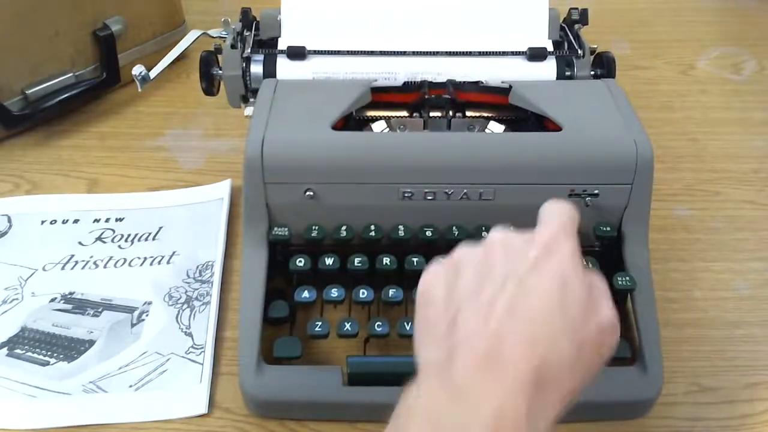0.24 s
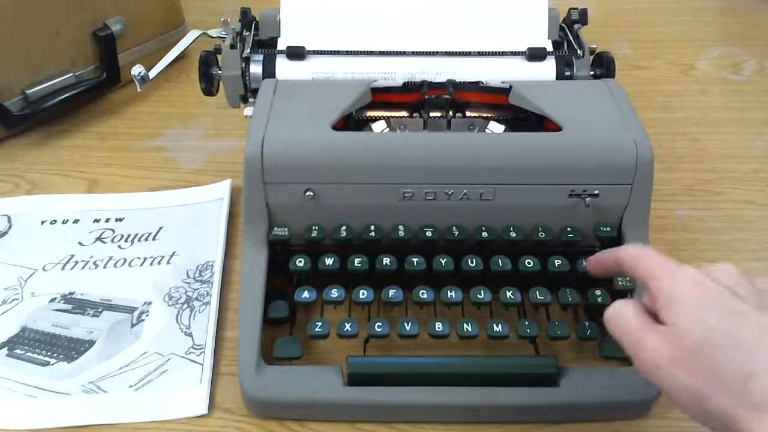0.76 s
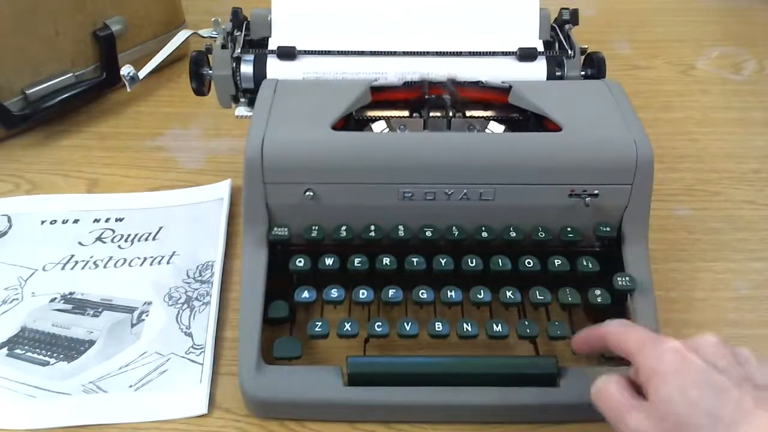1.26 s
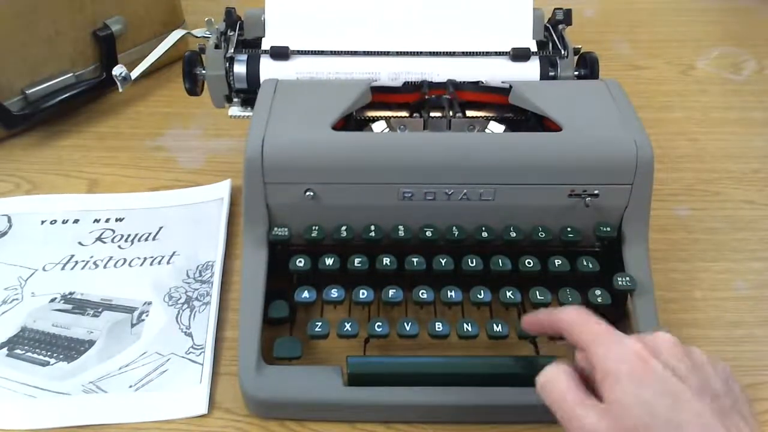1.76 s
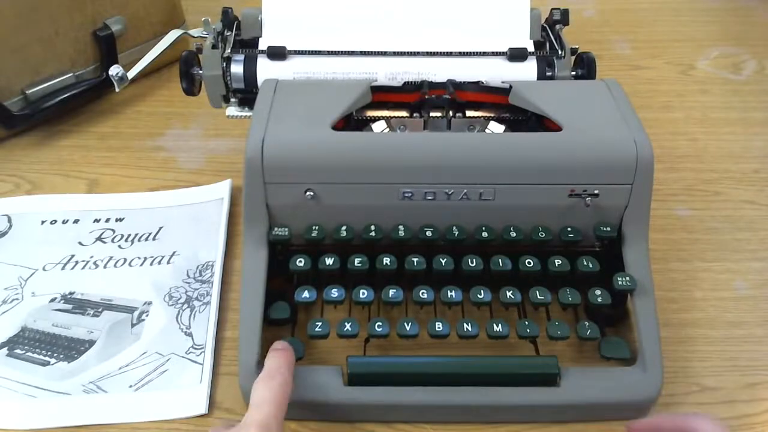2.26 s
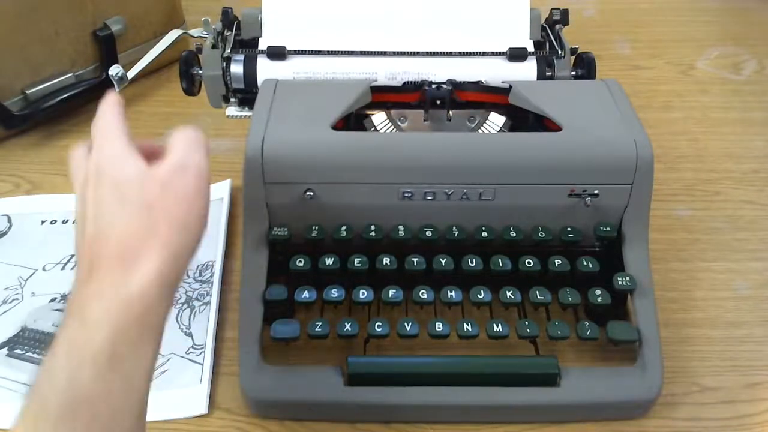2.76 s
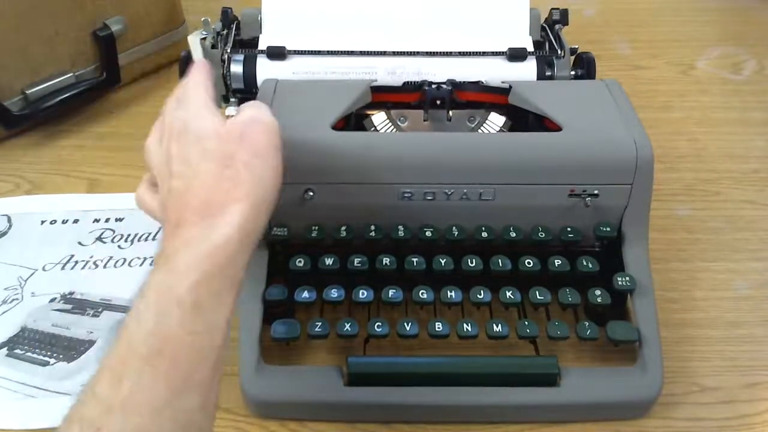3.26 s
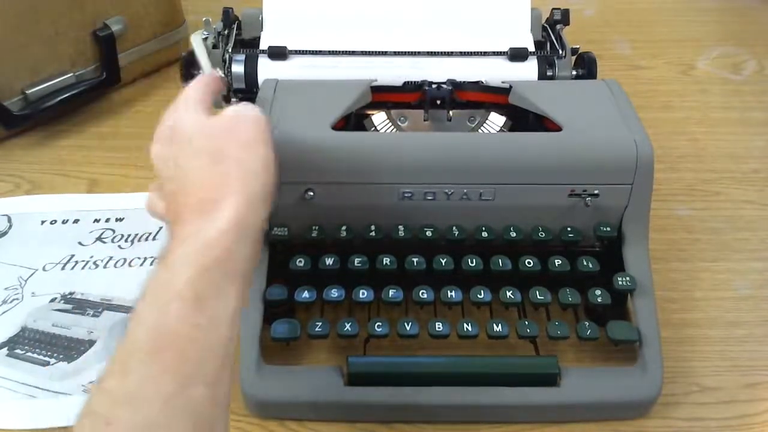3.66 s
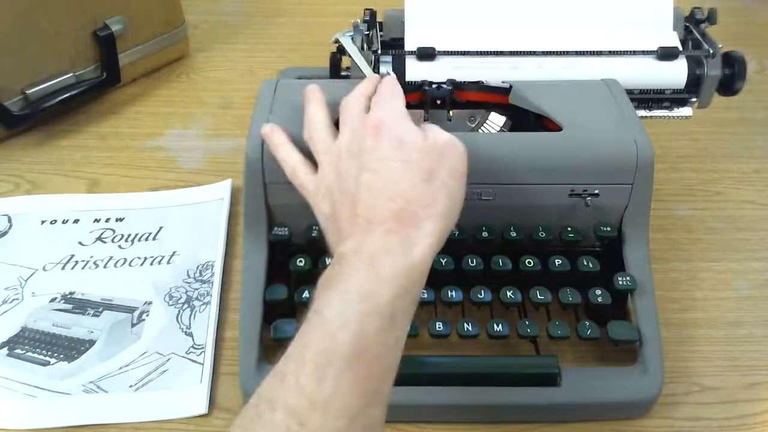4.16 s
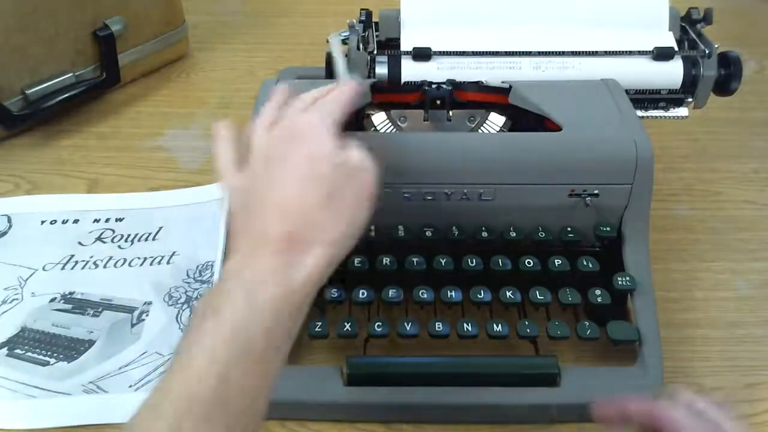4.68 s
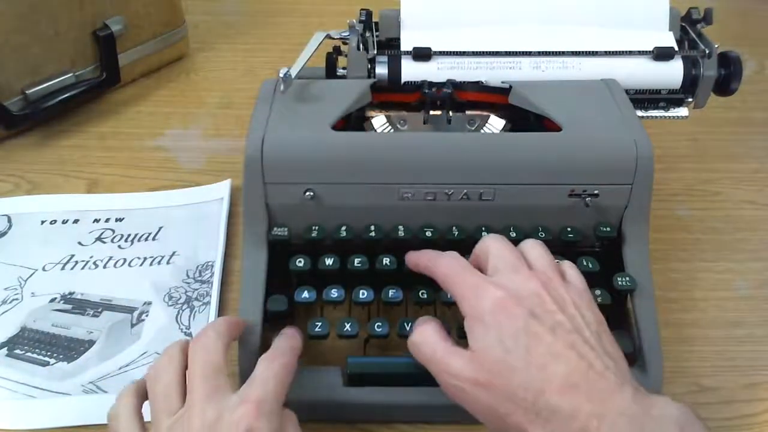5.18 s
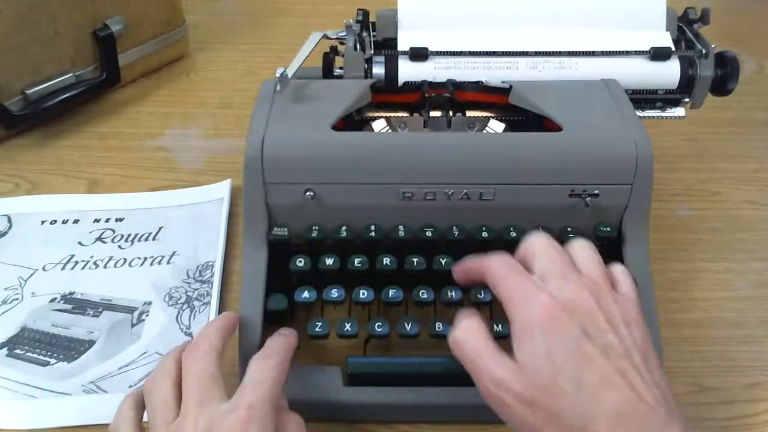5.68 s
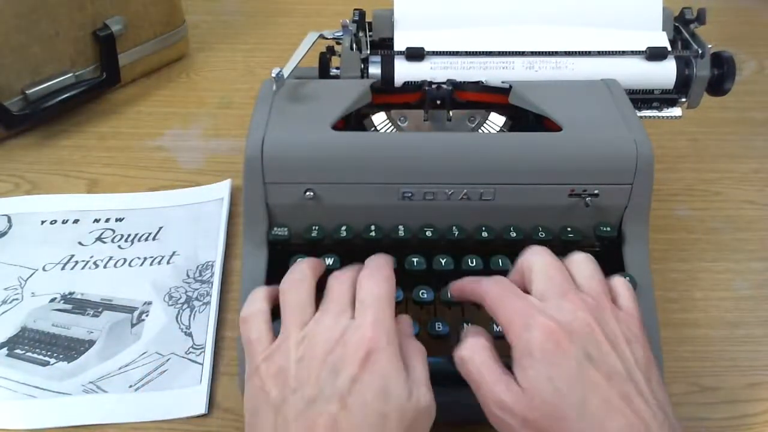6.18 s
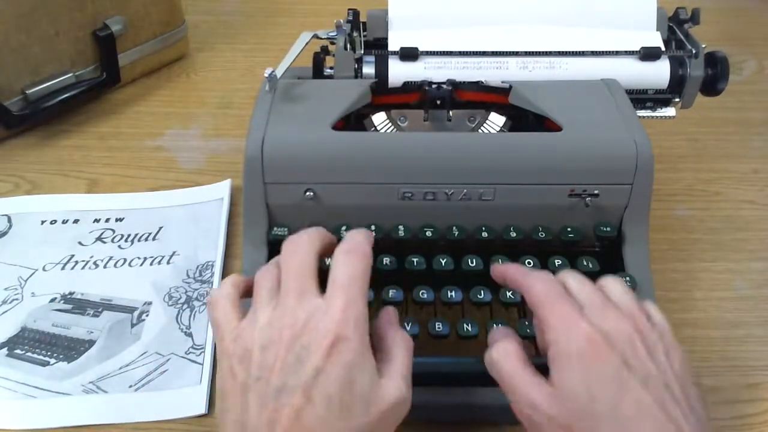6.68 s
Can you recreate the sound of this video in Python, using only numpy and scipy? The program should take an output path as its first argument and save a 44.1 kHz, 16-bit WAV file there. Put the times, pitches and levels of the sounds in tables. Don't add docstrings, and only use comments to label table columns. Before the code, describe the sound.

Close, dry typewriter clatter: spaced key strikes, lever clunks, a short carriage slide to its stop, quiet clicks, then a burst of typing.

```python
import sys
import numpy as np
from scipy import signal
from scipy.fft import rfft, irfft, next_fast_len
from scipy.io import wavfile
from scipy.ndimage import uniform_filter1d, minimum_filter1d

SR = 44100
rng = np.random.default_rng(int(sys.argv[2]) if len(sys.argv) > 2 else 0)


def voltage_ratio(decibels):
    exponent = np.asarray(decibels, float) / 20
    return 10 ** exponent


def output_pcm(signal):
    pcm = np.clip(np.atleast_2d(signal).T, -1, 1) * 32767
    wavfile.write(sys.argv[1], SR, np.round(pcm).astype(np.int16))


N = 305613
TIME_S = np.arange(N) / SR


def unit(x):
    return x / np.sqrt(np.mean(x ** 2) + 1e-20)


def along(points, hz):
    f, v = np.transpose(points)
    return np.interp(np.log(hz + 1), np.log(f + 1), v)


def filtered(x, response):
    m = next_fast_len(N + SR // 2)
    return irfft(rfft(x, m) * response(np.fft.rfftfreq(m, 1 / SR)), m)[:N]


def grit(spiky_db, grain_s):
    jumps = rng.standard_normal(N)[(np.arange(N) / (grain_s * SR)).astype(int)]
    return rng.standard_normal(N) * voltage_ratio(spiky_db * jumps)


def swell(t, db, t60, rise_s):
    return voltage_ratio(db - 60 * t / t60) * (1 - np.exp(-t / rise_s))


def shakes(rows, noise, rise_s, sharp, count=1):
    out, noise = np.zeros(N + SR), np.tile(noise, 2)
    for k, (s, db, t60, hz, ring_db) in enumerate(rows):
        t = np.arange(int(np.clip(t60, .06, .5) * SR)) / SR
        raw = noise[k * 4001:][:len(t)]
        ring = raw
        for _ in range(count):
            ring = signal.lfilter(*signal.iirpeak(hz, sharp, SR), ring)
        voice = unit(raw + voltage_ratio(ring_db) * unit(ring))
        out[round(s * SR):][:len(t)] += voice * swell(t, db, t60, rise_s)
    return out[:N]


def resonant(modes, broad_db):
    def peak(hz, centre, width):
        return 1j * hz * width / (centre ** 2 - hz ** 2 + 1j * hz * width)

    def response(hz):
        narrow = sum((-1) ** k * voltage_ratio(db) * peak(hz, c, w) for k, (c, w, db) in enumerate(modes))
        body = narrow + voltage_ratio(broad_db) * peak(hz, 1100, 1500)
        return body / (1 + 1j * hz / 2300) ** 2 * (0.5 + 0.6 / (1 + (hz / 2150) ** 12))

    return response


# (time [s], lead of the faint rattle before it [s], level of that rattle [dB], rattle level [dB],
# knock level [dB])
STROKES = [(0.003, 0.0015, -36.5, -27, -21), (0.2067, 0.026, -35, -26.5, -20),
           (0.7666, 0.015, -34, -26, -15), (1.002, 0.014, -37, -29.5, -16),
           (1.2057, 0.011, -37.5, -26, -16), (1.3838, 0.0078, -34, -30, -17.5),
           (1.6196, 0.026, -33, -26, -18), (1.8099, 0.025, -37, -26, -18), (5.5795, 0.01, -36, -23.5, -17),
           (6.1741, 0.013, -38.5, -26.5, -19.5), (6.2957, 0.0082, -29.5, -29, -18.5),
           (6.9176, 0.024, -35, -18.5, -9)]
SNAP_DB = [-60, -11.4, -10.5, -13.7, -14.3, -14.9, -15.1, -17, -2.7, -5.1, -3.6, -0.4]
# (time [s], peak level [dB], frequency [Hz])
TICKS = [
    (0.311, -28, 4260),
    (3.4188, -40, 6300),
    (4.263, -22.5, 5230),
    (6.49, -32, 3670),
    (0.217, -20, 5000),
    (1.2145, -23, 5300),
    (4.8023, -43, 5400),
]


def snaps():
    out, t = np.zeros(N + SR), np.arange(-40, 40) / SR
    strokes = [(s, db, 4860) for (s, *_), db in zip(STROKES, SNAP_DB)]
    for s, db, hz in strokes + TICKS:
        snap = np.sin(2 * np.pi * hz * t + 1) * np.exp(-(t / .00028) ** 2)
        for delay_s, loss_db in [(0, 0), (.0008, 7), (.0022, 16.5)]:
            out[round((s + delay_s) * SR) - 40:][:len(t)] += voltage_ratio(db - loss_db) * snap
    return out[:N]


# (time [s], rattle level [dB], knock level [dB], push level [dB], desk mode [Hz])
FALLS = [
    (0.099, -38, -12.5, -11, 155),
    (0.313, -34.5, -19, -13, 165),
    (0.896, -51.5, -23.5, -17, 210.3),
    (1.109, -62, -16.5, -11.5, 157.4),
    (1.29, -64, -13.5, -14.5, 165.7),
    (1.513, -35, -14.5, -20, 231),
    (1.706, -52, -19, -18, 189),
    (1.909, -43, -23, -18.5, 160),
    (5.672, -29, -18, -19.5, 191),
    (6.386, -30.5, -17.5, -19.5, 220),
]
# (time [s], level [dB], t60 [s], struck part [Hz], ring level [dB])
SPRINGS = [(0.727, -49, 1.5, 4500, -15), (0.84, -52, 0.31, 4780, -9.5), (2.3661, -48, 0.11, 3030, -19),
           (0.35, -50, 0.8, 3600, -6), (2.624, -36, 0.17, 4800, -12), (2.61, -48, 0.3, 3900, -8),
           (3.101, -68.5, 0.81, 4460, -16), (3.188, -57, 0.34, 3500, -9.5), (3.261, -48.5, 0.18, 5100, -23),
           (3.418, -49.5, 0.14, 6500, -4), (3.652, -61.5, 0.35, 3900, -7.5),
           (3.754, -42.5, 0.2, 2270, -1.5), (4.703, -43, 0.16, 2700, 5), (4.712, -41, 0.1, 4900, 6),
           (5.8187, -42, 0.17, 5960, -11.5), (6.252, -28, 0.17, 4400, -12),
           (6.492, -41.5, 0.38, 2250, -16.5), (6.601, -39, 0.21, 2500, -16.5), (6.63, -33, 0.14, 2200, 3),
           (2.642, -38.5, 0.22, 3400, -4), (5.84, -54, 0.33, 4540, -17.5), (3.36, -59.5, 0.24, 3700, -9),
           (0.894, -44, 0.25, 5100, -2), (1.05, -37, 0.27, 4650, -8), (1.25, -35, 0.29, 4500, -5),
           (1.44, -40.5, .4, 4860, -4), (6.675, -54, 0.35, 3300, -4), (4.29, -52, 0.4, 4900, 3),
           (2.74, -67, 1.1, 2600, -4), (2.93, -70, 0.79, 2300, -12), (5.35, -68.5, .6, 2600, -4),
           (4.13, -46, 0.27, 5600, -3), (3.9, -47, 0.48, 5400, 6.5), (5.74, -46.5, 0.35, 3700, -16),
           (0.31, -48, 0.33, 5000, -10.5), (1.94, -53, 0.5, 2800, 3), (0.69, -60, 1.5, 3000, -10),
           (6.42, -40, 0.25, 2900, 2), (5.85, -53, 0.4, 3000, -3)]
# (frequency [Hz], level per Hz [dB])
STEEL = [(1290, -29), (2200, 0), (2410, -5), (2660, -0.5), (3070, 0.5), (3290, 1.5), (3950, 0.5),
         (5060, -2), (6280, 0.5), (7520, -8.5), (9780, -56.5), (16500, -120)]


def rattle():
    leads = [(s - lead_s, db, 0.41, 4950, -8.5) for s, lead_s, db, *_ in STROKES]
    blows = [(s - .001, db, 0.24, 4950, -8.5) for s, *_, db, _ in STROKES]
    falls = [(s, db, 0.16, 4360, -6) for s, db, *_ in FALLS]
    rebounds = [(s, db + 3, .05, 5790, -3) for s, *_, db, _ in STROKES]
    bars = filtered(grit(spiky_db=2.0, grain_s=0.0012), lambda hz: voltage_ratio(along(STEEL, hz)))
    out = shakes(leads + blows + falls + SPRINGS + rebounds, bars, rise_s=.0025, sharp=8)
    band = filtered(out, lambda hz: np.exp(-((hz - 3510) / 500) ** 2))
    band_db = np.where(TIME_S < 5.605, -4.5, 2.5)
    return out + (voltage_ratio(band_db) - 1) * band


def typebars():
    return snaps() + rattle()


# (time [s], peak level [dB], t60 [s], struck part [Hz], ring level [dB])
ESCAPEMENT = [(0.165, -28, 0.5, 465, 0.5), (0.273, -18.5, 0.19, 900, 1), (0.475, -62, 1, 352, -6),
              (0.71, -42, 1, 890, 9.5), (0.859, -22, 0.55, 1463, 1), (1.05, -22.5, 0.25, 1500, 1),
              (1.43, -31, 1, 1300, 7.5), (1.66, -19, 0.39, 1400, -1.5), (1.775, -28, 0.6, 874, 2.5),
              (1.869, -18.5, 0.19, 956, 0), (5.636, -22, 0.44, 2030, -6.5), (5.813, -29, 0.24, 704, -13.5),
              (5.836, -17.5, 0.13, 810, -3), (6.125, -50, 0.6, 640, -5), (6.225, -17.5, 0.44, 1290, 0),
              (6.43, -21.5, 0.3, 1390, 4.5), (6.487, -17.5, 0.2, 1390, -3.5),
              (6.59, -18.5, 0.16, 545, -20.5), (6.634, -22, 0.22, 1225, 5.5), (6.87, -48.5, 0.43, 668, -5),
              (6.895, -33, 0.6, 1200, -5), (0.74, -42, 1, 1400, -5), (6.69, -38, 0.2, 1300, 0)]
# (time [s], peak level [dB], t60 [s], struck part [Hz], ring level [dB])
LEVERS = [(2.164, -54, 0.43, 662, -15), (2.63, -24.5, 0.23, 718, 6), (2.637, -15.5, 0.2, 635, -4.5),
          (2.956, -54.5, 0.18, 815, -11.5), (3.11, -60, 0.37, 2120, -1), (3.205, -62, 0.38, 371, -25),
          (3.258, -34, 0.34, 1580, 15.5), (3.366, -30.5, 0.11, 605, 2.5), (3.592, -59, 0.59, 1730, 12.5),
          (3.652, -56.5, 0.39, 1670, 3), (3.756, -36, 0.22, 500, 19), (3.875, -44, 0.28, 1350, 7),
          (3.939, -21, 0.042, 800, 0), (4.26, -21, 0.18, 1955, 13), (4.701, -22.5, 0.18, 1180, -12.5),
          (4.72, -22, 0.17, 1106, -6), (4.808, -38.5, 0.14, 1410, 10), (4.858, -38, 0.13, 1400, 4),
          (5.3, -59.5, 0.39, 456.5, 3.5), (5.36, -40, 0.098, 454, 11), (5.385, -53, 0.15, 604, -2),
          (5.526, -45, 0.18, 577, 8)]
# (frequency [Hz], width [Hz], level [dB])
FRAME = [(635, 78, -6), (872.2, 18, 2.5), (1300, 2.6, -4.5), (1390, 9.2, 3), (1823, 36, -5.5)]


def linkage():
    frame = filtered(grit(spiky_db=0.0, grain_s=.003), resonant(FRAME, broad_db=-9.0))
    strokes = [(max(s - .003, 0), db, 0.38, 1760, -12.5) for s, *_, db in STROKES]
    falls = [(s - .006, db, 0.17, 1225, -1.5) for s, _, db, *_ in FALLS]
    hard = shakes(strokes + ESCAPEMENT + LEVERS, frame, rise_s=0.0065, sharp=0.98)
    soft = shakes(falls, frame[::-1], rise_s=0.046, sharp=2.0)
    return voltage_ratio(-7.5) * (hard + voltage_ratio(4.5) * soft)


# (time [s], level [dB], t60 [s], frequency [Hz])
CATCHES = [
    (2.378, -44, 0.22, 2300),
    (2.38, -39, 0.22, 3070),
    (2.379, -48.5, 0.07, 6600),
    (3.418, -44.5, 0.1, 4320),
    (4.259, -36.5, 0.28, 2020),
    (4.261, -39, 0.11, 4890),
    (4.801, -49, 0.14, 4400),
    (4.8021, -42.5, 0.12, 5780),
    (4.855, -50, 0.14, 4600),
]


def catches():
    rows = [(*row, 34) for row in CATCHES]
    rings = shakes(rows, grit(spiky_db=3.5, grain_s=.001), rise_s=0.00077, sharp=5.5, count=2)
    return filtered(rings, lambda hz: 1 / (1 + (1500 / (hz + 1)) ** 8))


# (time [s], peak level [dB], frequency [Hz], t60 [s])
PINGS = [(0.0002, -19, 5550, .012), (2.378, -36.5, 6420, 0.035), (2.38, -35.5, 2300, .03),
         (2.384, -41.5, 1890, 0.054), (2.3836, -46, 7150, 0.035), (2.387, -40.5, 2650, 0.032),
         (2.3945, -34, 1936, 0.032), (2.4, -37.5, 1873, .07), (2.643, -20.5, 676, 0.036),
         (3.261, -45, 1590, 0.062), (3.4188, -36, 4250, 0.028), (3.4184, -46, 6580, .05),
         (3.419, -50.5, 3560, 0.18), (3.4186, -51, 5920, .14), (3.427, -36, 4400, 0.047),
         (3.7773, -35, 1467, .06), (3.7765, -39, 952, 0.1), (3.915, -28, 1370, 0.036),
         (3.948, -25, 1340, 0.028), (3.985, -25, 1300, 0.1), (4.058, -28.5, 1360, 0.056),
         (4.2612, -32, 4900, 0.04), (4.262, -26, 1833, 0.099), (4.263, -31.5, 591, .15),
         (4.269, -30, 3960, 0.02), (4.2711, -29, 1904, 0.12), (4.719, -42, 5240, 0.031),
         (4.8, -35.5, 4440, 0.055), (4.803, -41, 5900, 0.069), (4.8038, -35.5, 5240, 0.029),
         (4.8025, -44, 6810, 0.089), (4.8083, -33.5, 4328, 0.046), (5.365, -47, 630, 0.26),
         (6.383, -30, 1353, 0.18), (1.909, -26.5, 1390, .15), (0.1, -28, 1390, .06), (3.951, -27, 820, 0.2),
         (4.0, -30.5, 795, 0.092), (4.82, -44.5, 1500, 0.059), (4.86, -40.5, 1505, .06),
         (3.282, -34.5, 1520, 0.036), (6.492, -26.5, 1390, 0.071), (6.62, -27.5, 1450, .08),
         (2.34, -65.5, 646, 0.6), (4.803, -43.5, 3680, 0.08), (0.897, -24, 1850, 0.13),
         (0.914, -30.5, 1300, 0.051), (1.514, -30, 1490, 0.052), (0.319, -28.5, 1486, 0.051),
         (4.119, -28.5, 1650, 0.14), (4.144, -34.5, 1030, 0.11), (5.378, -48, 446, .08),
         (0.797, -25, 1850, .08),
    (3.85, -42, 1290, .3),
    (3.88, -38, 1290, .2),
    (4.09, -29, 1400, .1),
    (4.075, -30, 1950, .08),
    (4.11, -30, 1250, .08),
    (6.605, -28, 1300, .08),
    (1.013, -25, 950, .06),
    (3.99, -28, 850, .12),
]


def pings():
    out, t = np.zeros(N + SR), np.arange(SR // 5) / SR
    for s, db, hz, t60 in PINGS:
        out[round(s * SR):][:len(t)] += np.sin(2 * np.pi * hz * t) * swell(t, db, t60, 0.00054)
    return out[:N]


# (time [s], rolling level [dB], scrape level [dB])
SLIDE = [
    (3.757, -43, -53.5),
    (3.822, -57, -60.5),
    (3.98, -30, -34),
    (4.054, -33.5, -39.5),
    (4.112, -33, -50.5),
    (4.196, -49.5, -51),
    (4.25, -49, -62),
    (4.262, -39.5, -46.5),
    (4.27, -39, -42),
]
# (frequency [Hz], width [Hz], level [dB])
RAIL_FAST = [(837, 19, -1), (1310, 18, 2), (1454, 64, -3), (1690, 17, -3), (1850, 55, -6.5),
             (2022, 34, -15.5), (2320, 130, -15.5)]
# (frequency [Hz], width [Hz], level [dB])
RAIL_SLOW = [(657, 69, -11), (1030, 24, -3.5), (1300, 26, -1.5), (1450, 40, -1), (1650, 90, -1),
             (1900, 70, -3), (2303, 43, -11)]
SLOWING_S = (4.03, 4.09)


def carriage():
    s, *levels_db = np.transpose(SLIDE)
    rolling, scrape = [voltage_ratio(np.interp(TIME_S, s, db, -120, -120)) for db in levels_db]
    rack = unit(filtered(grit(spiky_db=4.0, grain_s=0.00026), lambda hz: voltage_ratio(along(STEEL, hz))))
    rollers = filtered(grit(spiky_db=-1.5, grain_s=0.0062), lambda hz: 1 / (1 + (520 / (hz + 1)) ** 4))
    fast = unit(filtered(rollers, resonant(RAIL_FAST, broad_db=-8.0)))
    slow = unit(filtered(rollers, resonant(RAIL_SLOW, broad_db=-8.0)))
    turn = np.interp(TIME_S, SLOWING_S, [0, np.pi / 2])
    return rolling * (np.cos(turn) * fast + np.sin(turn) * slow) + scrape * rack


# (delay [s], level [dB], frequency [Hz])
KEY_PUSHES = [
    (.011, -23, 221),
    (.034, -20, 170.4),
]
# (time [s], peak level [dB],
# frequency [Hz], t60 [s])
PUSHES = [(0.07, -18, 165, 0.24), (0.147, -17.5, 153, 0.14), (0.269, -18, 159.2, 0.33),
          (0.366, -14, 158, 0.079), (0.406, -23.5, 133, 0.091), (0.472, -32, 223, 0.13),
          (0.677, -45.5, 243, 0.15), (0.844, -22.5, 140, 0.093), (0.974, -22, 130.5, 0.25),
          (1.17, -23.5, 151.3, 0.34), (1.599, -19.5, 141, 0.16), (1.687, -19.5, 169.6, 0.15),
          (1.789, -22.5, 205, 0.095), (1.887, -25, 139, 0.31), (1.99, -29, 163.7, 0.18),
          (5.657, -19.5, 161, 0.12), (5.702, -23, 175, 0.16), (5.775, -26, 137.3, 0.18),
          (5.832, -19, 141, 0.23), (5.851, -21, 180, 0.17), (5.908, -26, 151.8, 0.21),
          (6.31, -12.5, 179, 0.078), (6.45, -20, 191, 0.15), (6.493, -19, 171, 0.15),
          (6.517, -18, 172, 0.1), (6.546, -22.5, 164.2, 0.2), (6.569, -26, 159, 0.13),
          (6.616, -22, 158, 0.095), (6.639, -24, 146.4, 0.19), (6.687, -29.5, 162, 0.21),
          (2.294, -39, 242, 0.14), (2.389, -49, 251, 0.092), (2.472, -41.5, 241, 0.11),
         (2.639, -11, 151, 0.15), (2.662, -15, 169.4, 0.12), (2.69, -19, 141.6, 0.2),
         (2.724, -19, 164, 0.15), (2.76, -25, 150.4, 0.17), (2.793, -31, 156.3, 0.12),
         (3.279, -27.5, 194, 0.13), (3.3, -27.5, 153.6, 0.22), (3.377, -21, 204.5, 0.1),
         (3.395, -24.5, 195, 0.079), (3.556, -57.5, 258.6, 0.21), (3.777, -18, 197.6, 0.081),
         (3.815, -28, 142, 0.21), (3.851, -40, 152, 0.2), (3.958, -31, 138.6, 0.25),
         (4.025, -21, 154, 0.09), (4.282, -25, 250, 0.098), (4.558, -53.5, 141, 0.13),
         (4.733, -24.5, 218, 0.17), (4.781, -27.5, 188, 0.078), (4.939, -37, 200, 0.12),
         (4.954, -36, 209.5, 0.11), (5.125, -40.5, 199.8, 0.12), (5.317, -37.5, 193.2, 0.38),
         (5.363, -18, 181, 0.13), (5.426, -29, 150.6, 0.14), (5.483, -33.5, 200, 0.43),
         (5.383, -23, 173.6, 0.095), (5.489, -34, 249, 0.065), (3.417, -25.5, 173, 0.049),
         (3.427, -33, 157, 0.072), (1.222, -20, 270, 0.072), (1.246, -20.5, 260, 0.073),
         (4.745, -26, 271, 0.094), (0.799, -25.5, 268, 0.059), (1.72, -25, 269, .07), (6.272, -19, 170, .1),
         (1.378, -18, 160, .08), (1.08, -20, 150, .1), (2.41, -47, 220, .2), (0.055, -17, 150, .1),
         (5.575, -18, 190, .07)]
# (frequency [Hz], level [dB])
DESK = [(75, -19), (147, -8.5), (200, -17), (265, -11)]
# (frequency [Hz], level per Hz [dB])
WOOD = [(35, -43), (70, 3), (150, 2), (300, -7), (600, -10.5), (1200, -46), (4000, -120)]


def desk():
    strokes = [(s + delay_s, db, hz, 0.14) for s, *_ in STROKES for delay_s, db, hz in KEY_PUSHES]
    falls = [(s + .014, db, hz, 0.14) for s, _, _, db, hz in FALLS]
    boom, t = np.zeros(N + SR), np.arange(SR // 3) / SR
    thuds = []
    for s, db, hz, t60 in strokes + falls + PUSHES:
        light_db = 0.36 * min(db + 24.5, 0)
        ring = np.sin(2 * np.pi * hz * t)
        for (mode_hz, mode_db), luck in zip(DESK, rng.standard_normal(len(DESK))):
            phase = 2 * np.pi * mode_hz * (1 + 0.013 * luck) * t + 2 * luck
            ring += voltage_ratio(mode_db + light_db + 4.6 * luck) * np.sin(phase)
        rise = 1 - np.exp(-t / 0.0045)
        boom[round(s * SR):][:len(t)] += ring * swell(t, db, t60, 0.0045) * rise
        thuds.append((s, db + light_db - 11.0, 1.74 * t60, hz, -6))
    wood = filtered(rng.standard_normal(N), lambda hz: voltage_ratio(along(WOOD, hz)))
    return boom[:N] + shakes(thuds, wood, rise_s=0.00035, sharp=1.5)


# (frequency [Hz], level per Hz [dB])
AIR = [(24, -46), (40, -13.5), (163, 2.5), (281, -5.5), (374, -10.5), (1190, -14.5), (1270, -11),
       (2810, -24), (3000, -24), (6170, -28), (7520, -30.5), (9780, -71.5), (16500, -120)]


def room(clatter):
    size = int(0.072 * SR)
    wash = uniform_filter1d(np.abs(clatter), size=size, origin=size // 3)
    level = voltage_ratio(-70.5) + voltage_ratio(-2) * wash
    air = unit(filtered(rng.standard_normal(N), lambda hz: voltage_ratio(along(AIR, hz))))
    dull = filtered(air, lambda hz: 1 / (1 + (hz / 2300) ** 8))
    return level * dull + np.minimum(level, voltage_ratio(-62.0)) * (air - dull)


def scene():
    clatter = typebars() + linkage() + carriage()
    return (clatter + catches() + pings() + desk() + room(clatter))[None]


HOP, LEAD = 2822, 1540


def blocks(x):
    padded = np.pad(x, (2 * HOP - LEAD, 3 * HOP), "edge")
    return np.lib.stride_tricks.sliding_window_view(padded, 2 * HOP)[::HOP]


# (frequency [Hz], level [dB])
THRIFT = [(1500, -30), (1850, -5), (2100, 7.5), (6000, 7), (6900, 10), (7900, 12)]


def thinned(x, mood_db, share, crest_db):
    treble = filtered(x, lambda hz: np.clip(hz / 300 - 4, 0, 1))
    bright = filtered(x, lambda hz: np.clip(hz / 500 - 4.5, 0, 1))
    fast, quick, slow = (np.sqrt(np.abs(uniform_filter1d(bright ** 2, size=n))) for n in (60, 250, 900))
    treble *= 1 - uniform_filter1d(1. * (fast > voltage_ratio(crest_db) * slow), size=40)
    held = -minimum_filter1d(-np.log(quick + 1e-5), size=1101, origin=500)
    held = np.exp(uniform_filter1d(held, size=120))
    n, k = np.arange(2 * HOP), np.arange(1000)
    window = np.sqrt(2 / HOP) * np.sin(np.pi * (n + .5) / (2 * HOP))
    basis = window * np.cos(np.pi / HOP * np.outer(k + .5, n + .5 + HOP / 2))
    lines = blocks(treble / held) @ basis.T
    loud = blocks(x).std(axis=1, keepdims=True) / blocks(held).max(axis=1, keepdims=True) + 1e-9
    band = np.sqrt(np.abs(uniform_filter1d(lines ** 2, size=60, axis=1))) + 1e-9
    mood = np.repeat(rng.standard_normal((len(lines), 40)), 25, axis=1)
    coarse = voltage_ratio(along(THRIFT, (k + .5) * SR / (2 * HOP)) + mood_db * mood)
    step = coarse * band ** (1 - share) * loud ** share
    rounded = np.sign(lines) * np.floor(np.abs(lines) / step + 0.44) * step
    halves = (rounded - lines) @ basis
    error = (halves[:-1, HOP:] + halves[1:, :HOP]).ravel()
    return x + held * error[HOP - LEAD:][:N]


# (start [s], end [s], level [dB])
HUSH = [
    (0.42, 0.6, -10),
    (2.012, 2.15, -10),
    (4.38, 4.45, -4),
    (4.775, 4.797, -14),
    (5.917, 6.1, -12),
    (6.75, 6.878, -15),
    (1.135, 1.185, -5),
]


def hushed(x):
    db = sum(depth_db * ((TIME_S > a) & (TIME_S < b)) for a, b, depth_db in HUSH)
    treble = filtered(x, lambda hz: np.clip((hz - 2250) / 300, 0, 1))
    return x + (voltage_ratio(uniform_filter1d(1. * db, size=300)) - 1) * treble


def low_pass(x):
    return signal.sosfilt(signal.butter(12, 9600, fs=SR, output="sos"), x)


def record(dry):
    top_hz, image_hz, mirror_hz = 8000, 9600, 15000
    x = hushed(thinned(dry[0], mood_db=3.5, share=.27, crest_db=7))
    x = filtered(x, lambda hz: np.clip((top_hz - hz) / 250, 0, 1) ** 2 * hz ** 2 / (hz ** 2 + 45 ** 2))
    mirror = x * np.cos(2 * np.pi * mirror_hz * TIME_S) * voltage_ratio(-31.5)
    image = filtered(mirror, lambda hz: np.clip((hz - top_hz) / 200 + 1, 0, 1)
                     * np.clip((image_hz - hz) / 100, 0, 1))
    mix = (x + image)[None]
    return low_pass(mix)


dry = scene()
out = record(dry)
output_pcm(out)
```